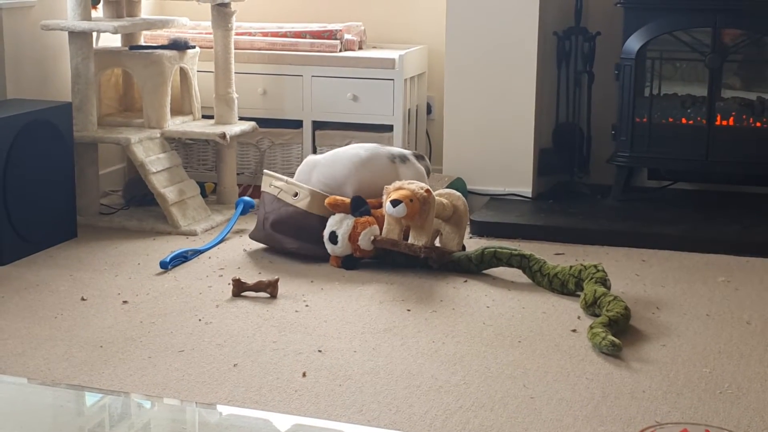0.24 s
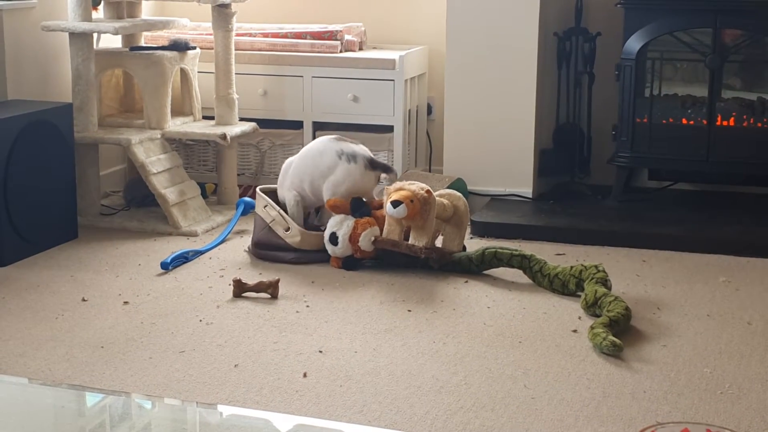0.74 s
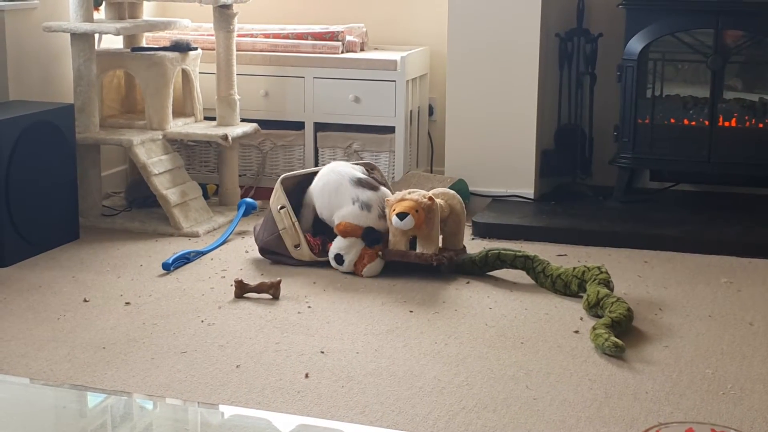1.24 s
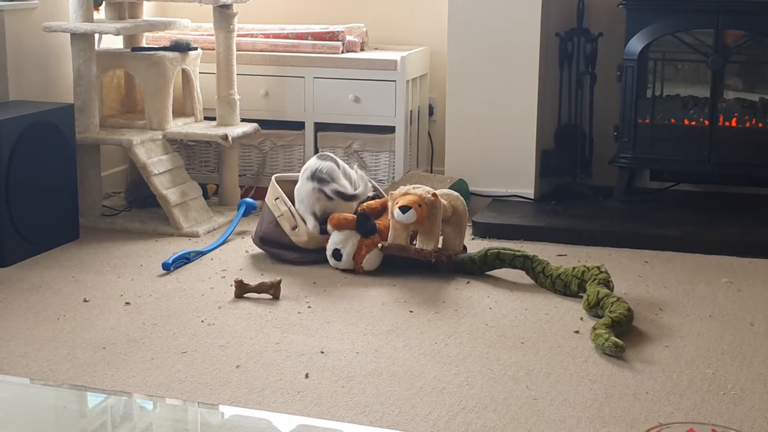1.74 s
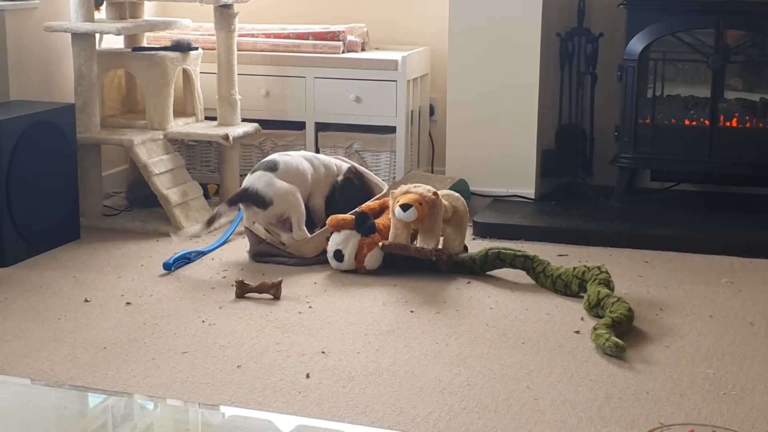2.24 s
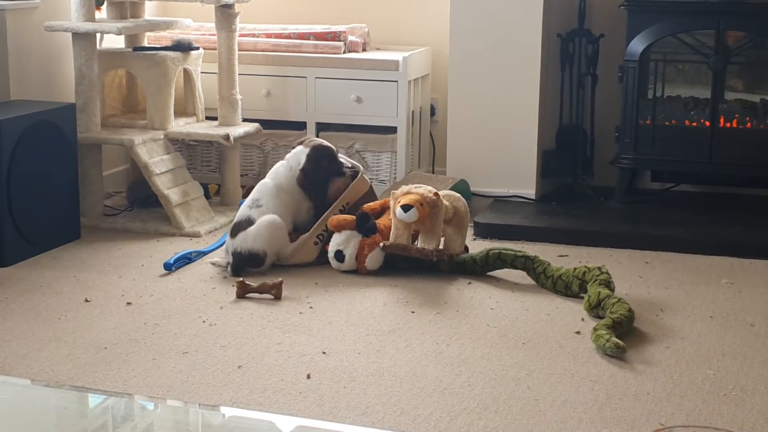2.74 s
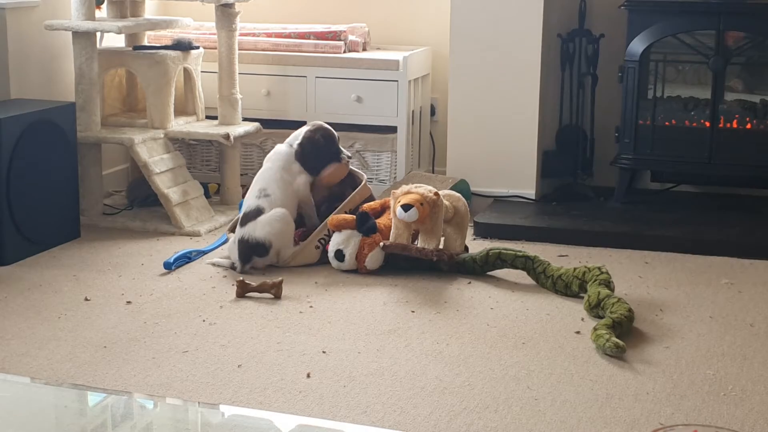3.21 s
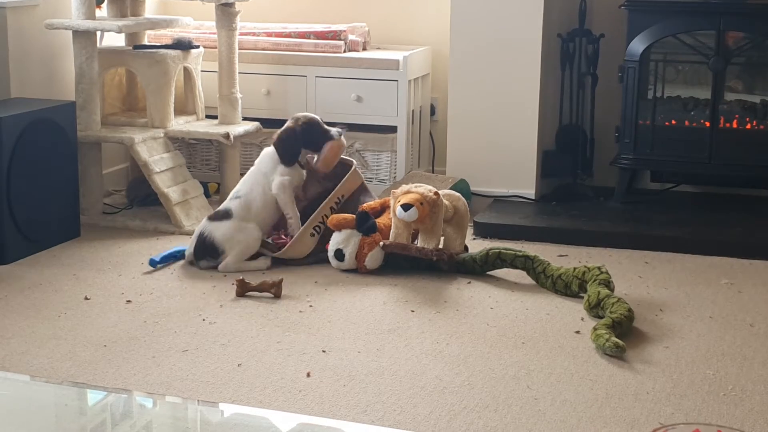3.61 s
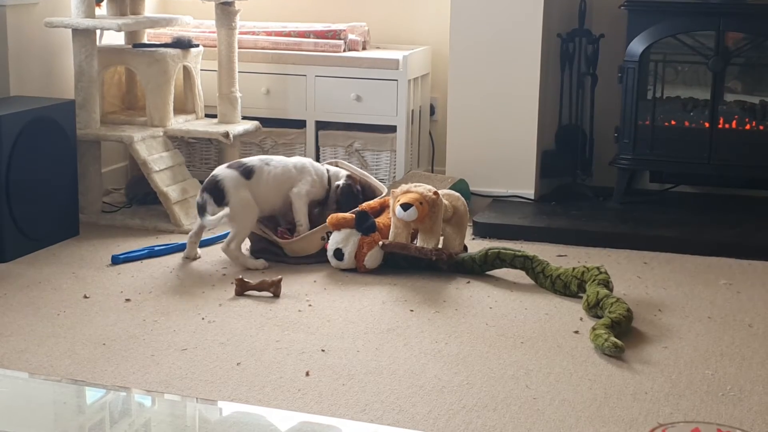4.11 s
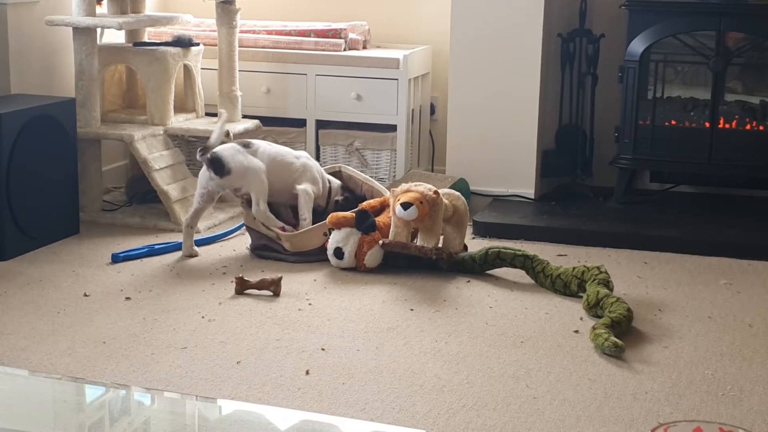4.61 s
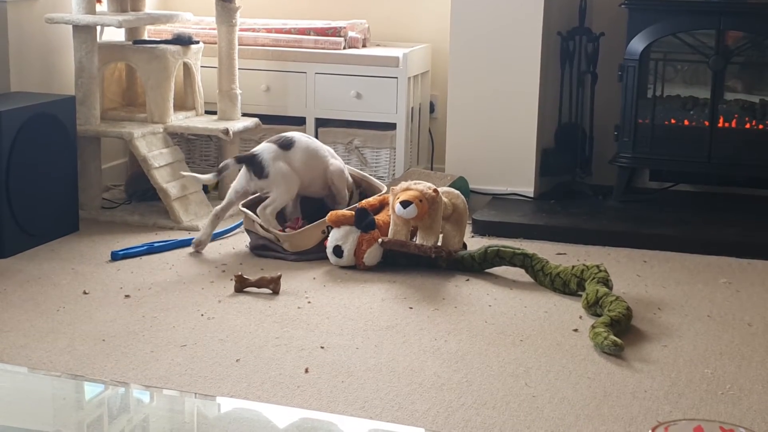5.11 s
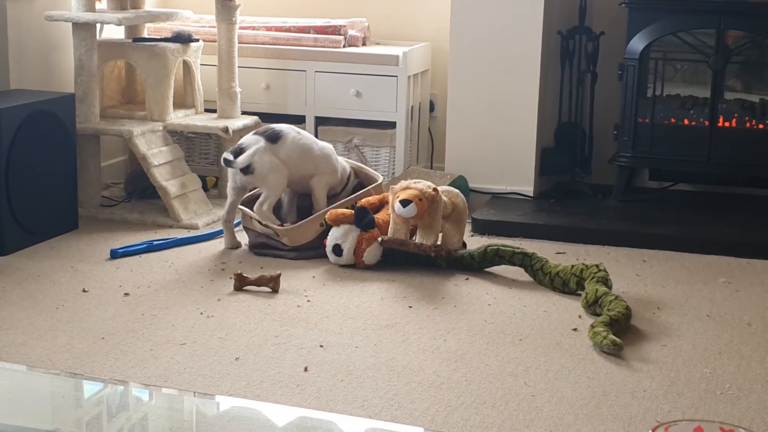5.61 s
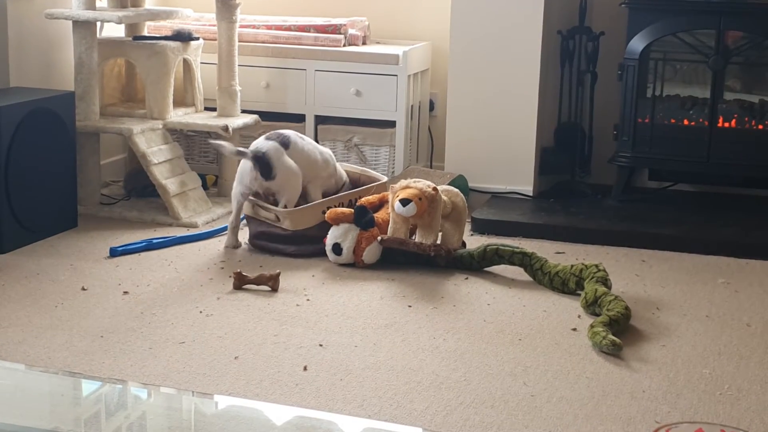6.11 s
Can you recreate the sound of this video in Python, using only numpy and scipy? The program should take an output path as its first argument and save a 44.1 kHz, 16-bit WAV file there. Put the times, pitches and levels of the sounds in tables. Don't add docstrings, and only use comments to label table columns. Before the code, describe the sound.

A puppy rummages in a fabric toy basket in a carpeted living room, heard in stereo by a phone, with a short room response. Two quick, reedy squeaky-toy chirps open at 0 s, two more come at 0.4 s with a paw and toy knock, and another at 0.7 s. Soft cloth strokes continue; a squeak at 1.6 s leads to a paw thump and dull claw catch at 1.75 s. Faint knocks and paired chirps come around 2.1-2.3 s, then a brisk rustle. At 3.3-3.4 s two squeaks, the second strongest, precede the loudest burst at 3.6 s: bright scratch, toy clatter and low, slowing basket judder. A shorter judder and floor rumble follow at 3.85 s. Squeaks at 4.5, 4.8, 5.4 and 5.8 s sit among light rustles, a paw pat at 5.2 s, faint tag tinkles and a toy knock near 6 s. Low hum and faint hiss remain steady.

```python
import sys
import numpy as np
from scipy import signal
from scipy.fft import rfft, irfft, next_fast_len
from scipy.io import wavfile
from scipy.ndimage import uniform_filter1d, map_coordinates

SR = 44100
rng = np.random.default_rng(int(sys.argv[2]) if len(sys.argv) > 2 else 0)


def voltage_ratio(level):
    return 10 ** (np.asarray(level, float) / 20)


def wav_record(signal):
    frames = np.transpose(np.atleast_2d(signal))
    bounded = np.clip(frames, -1, 1)
    quanta = np.round(bounded * 32767).astype(np.int16)
    wavfile.write(sys.argv[1], SR, quanta)


N = 280035

# [t/s, squeeze/s, release/s, full-pressure pitch f/Hz, level/dB]
SQUEAKS = [(.016, 0.014, 0.019, 1970, -36.5), (.061, 0.0039, 0.023, 1287, -45),
           (.369, 0.0081, 0.025, 1978, -40.5), (.404, 0.00384, .024, 1417, -47),
           (.663, .036, .016, 1433, -41), (1.578, 0.025, 0.0033, 2010, -40.5),
           (2.233, .016, 0.014, 1339, -47), (2.259, 0.0031, .02, 1644, -40),
           (3.328, 0.0044, 0.02, 1334, -39), (3.401, 0.00434, 0.0149, 1500, -32.5),
           (4.468, .03, .013, 1518, -43), (4.83, .015, .018, 1678, -37.5), (5.421, .02, 0.029, 1406, -47),
           (5.782, 0.0066, 0.031, 1350, -45.5)]
# [slack pitch f/Hz, brightness/dB per octave, leaking air level/dB, left minus right/dB, lift near 3 kHz/dB]
SQUEAK_COLOURS = [(1395, 0.5, -9, -1.5, 5.5), (1229, 3.5, -7, -3.5, 8.5), (1350, -1.5, -3, -2.5, 1),
                  (1273, -0.5, -2, -3.5, 1), (1377, 0.5, -14.5, -3.5, 3), (1460, -2, -15, -1.5, 3.5),
                  (1300, -0.5, -17, 4, -6), (1484, -0.5, -10, -3, 1.5), (1230, 4.5, -27, -1.5, 9),
                  (1422, 4.5, -11, -1, 5), (1388, 2.5, -18.5, -0.5, 3), (1456, 2.5, -10.5, -2, 7.5),
                  (1362, 2.5, -21, -0.5, 1.5), (1250, 3.5, -19.5, -1.5, 6)]
# [f/Hz, level/dB]
REED = [(650, -69), (1100, 3), (2820, -13), (3360, -11.5), (4150, -9.5), (5070, -12.5), (5540, -13.5),
        (7300, -13), (9210, -12.5), (13100, -17), (15500, -56)]
# [t/s, level/dB, body pitch f/Hz, shake length/s]
PAWS = [(0.375, -53, 223, .03), (0.672, -51.5, 120, 0.052), (1.504, -66, 40, 0.054),
        (1.751, -44.5, 218, 0.041), (1.764, -49.5, 75.4, 0.13), (2.105, -51, 297, .05),
        (2.145, -60.5, 82, 0.17), (3.578, -50, 51.5, 0.16), (3.648, -39.5, 296, 0.04),
        (3.694, -58, 280, .04), (3.924, -43, 195, 0.013), (5.227, -47, 282, 0.043),
        (5.242, -66, 72.4, 0.086), (5.993, -46, 370, 0.016)]
# [t/s, level/dB, body pitch f/Hz, shake
# length/s]
TOYS = [(.002, -49, 1080, 0.015), (0.374, -43.5, 610, 0.029), (0.575, -48, 3730, 0.0034),
        (2.106, -56, 1110, 0.0097), (2.267, -51, 458, 0.086), (2.618, -50, 1100, 0.014),
        (2.849, -68, 915, 0.006), (3.579, -52, 590, 0.026), (3.642, -42, 1120, 0.032),
        (3.643, -43.5, 1800, 0.031), (3.904, -54, 756, 0.056), (4.259, -56.5, 1100, 0.035),
        (4.261, -56, 444, 0.019), (4.629, -58, 1100, 0.044), (5.988, -41, 796, 0.035),
        (6.017, -65, 1300, 0.091)]
# [t/s, level/dB, body pitch f/Hz, shake length/s]
CLAWS = [
    (1.753, -54.5, 1750, 0.03),
    (3.574, -51, 3820, 0.079),
    (3.64, -39, 5200, 0.024),
    (3.79, -64, 1950, 0.027),
    (3.901, -63.5, 1300, 0.097),
    (4.148, -69, 4000, .08),
]
# [t/s, shudder rate f/Hz, level/dB]
SHUDDERS = [
    [(3.568, 131, -42), (3.574, 132, -32.5), (3.59, 108.2, -35), (3.61, 96, -33.5), (3.635, 91, -38),
     (3.665, 90.5, -32.5), (3.695, 95, -65), (3.73, 92, -65)],
    [(3.852, 208, -52), (3.866, 177.6, -35.5), (3.878, 84.8, -41), (3.9, 57.7, -35), (3.93, 79.4, -49),
     (3.97, 71, -51.5), (4.02, 84, -61)],
]
# [t/s, level/dB, low modes level/dB, middle modes level/dB, top modes level/dB]
TINKLES = [
    (.802, -78, -18, -12, 8),
    (1.28, -84, -10, 2, -12),
    (3.955, -70, -14, -5, -10),
    (5.085, -79, -2, -2, -4),
    (5.673, -70.5, 0, 2.5, -14),
    (5.942, -79.5, 8, -16, -22),
    (6.129, -84.5, 12.5, -20, -22),
]
# [f/Hz, level/dB, time to fall 60 dB/s]
TAG_MODES = [
    [(5430, 1.5, 0.088), (5700, -4, 0.12), (5900, -6, 0.12), (4850, -5, 0.14)],
    [(11400, 4, 0.091), (11780, -8, .1)],
    [(14700, -5, .15), (15520, 1, .15)],
]
# [full contact t/s, hold/s, level/dB, brightness/dB per octave]
STROKES = [(0.237, 0.015, -62.5, -1.5), (0.477, 0.027, -77, 3), (0.612, 0.11, -57, -2),
           (0.854, 0.09, -62, 1.5), (1.128, 0.042, -56.5, 1), (1.282, 0.23, -66.5, -0.2),
           (1.748, 0.024, -57, -2), (1.854, 0.16, -63, 0.6), (2.13, 0.049, -66, 2.5),
           (2.24, 0.091, -63, -2), (2.372, .02, -51.5, 0.7), (2.624, 0.11, -63.5, 1.2),
           (3.12, 0.28, -73.5, -0.5), (3.463, 0.17, -56, -0.5), (3.808, 0.034, -61.5, -3),
           (4.186, 0.021, -64, 1.5), (4.597, 0.14, -70.5, -1), (4.973, 0.043, -68.5, 0),
           (5.326, 0.083, -62, 0.1), (5.664, 0.21, -70.5, 3.5), (6.03, 0.03, -67.5, 2)]
# [f/Hz, level/dB per Hz]
CLOTH = [(300, -3), (800, -4.5), (1500, -5), (3000, -9), (6400, -10), (9000, -15), (12400, -20.5),
         (14000, -24.5), (15600, -32)]
# [t/s, hold/s, level/dB]
TREADS = [
    (0.077, 0.021, -62),
    (0.38, .03, -73),
    (1.33, .06, -63),
    (2.25, .1, -67),
    (3.1, 0.034, -69),
    (3.82, 0.11, -54),
    (4.227, 0.024, -73),
    (5.35, 0.049, -63.5),
    (5.966, 0.046, -62),
]
# [f/Hz, level/dB per Hz]
BOARDS = [(13, -59), (22, -18), (70, -6), (87, 7), (146, -10.5), (180, -4), (230, -37), (400, -120)]
# [f/Hz, level/dB per Hz]
HUM = [(71, -59), (120, -27.5), (146, -19), (173, -4.5), (233, -3), (264, -7), (327, -6.5), (377, -20),
       (475, -15.5), (510, -17.5), (557, -14.5), (787, -17), (830, -32), (875, -16.5), (1000, -63),
       (1300, -65), (2200, -120)]
# [f/Hz, level/dB per Hz]
HISS = [(470, -49), (800, -13.5), (1280, -10.5), (1530, -26), (1910, -16.5), (2810, -40), (3260, -38.5),
        (7320, -33), (8610, -33), (15600, -46)]
# [f/Hz, likeness/0 to 1]
ALIKE = [(60, 0.86), (240, 1), (950, 0.54), (3770, 0.024), (15000, 0.02)]
# [f/Hz, time to fall 60 dB/s]
ROOM = [(100, 0.22), (1400, 0.28), (5000, 0.25), (12000, 0.21)]
# [f/Hz, left minus right/dB]
SHADE = [(60, 0), (120, 0), (240, 0.5), (480, -0.5), (950, 1), (1890, 2), (3770, 6.5), (7520, 2),
         (15000, 2)]
# [f/Hz, half width f/Hz, level/dB]
DIPS = [(4350, 880, -2.5), (7465, 760, -8), (15100, 2700, -3)]


def unit(x):
    return x / np.sqrt(np.mean(x ** 2) + 1e-20)


def along(points, hz):
    f, v = np.transpose(points)
    return np.interp(np.log(hz + 1), np.log(f + 1), v)


def wobble(rate, size):
    return map_coordinates(rng.standard_normal(N // 256), [np.arange(size) * rate / SR])


def filtered(x, response):
    m = next_fast_len(x.shape[-1] + 8192)
    spectrum = rfft(x, m) * response(np.fft.rfftfreq(m, 1 / SR))
    return irfft(spectrum, m)[..., :x.shape[-1]]


def gesture(rows):
    s, *columns = np.transpose(rows)
    t = np.arange(s[0], s[-1], 1 / SR)
    return round(s[0] * SR), [np.interp(t, s, column) for column in columns]


def contact_db(t, s, hold, attack_db_s, release_db_s):
    return -attack_db_s * np.maximum(s - t, 0) - release_db_s * np.maximum(t - s - hold, 0)


def rush(spectrum, alike, patchy_db):
    z = signal.stft(rng.standard_normal((2, N)), nperseg=512)[2]
    patches = uniform_filter1d(rng.standard_normal(z.shape[1:]), 6, 0)
    patches = uniform_filter1d(patches, 10, 1)
    pair = signal.istft(z * voltage_ratio(patchy_db * unit(patches)), nperseg=512)[1][:, :N]

    def mid_side(hz):
        turn = np.arccos(np.clip(along(alike, hz), -1, 1)) / 2
        return voltage_ratio(along(spectrum, hz)) * [np.cos(turn), np.sin(turn)]

    mid, side = filtered(pair, mid_side)
    return unit(np.array([mid + side, mid - side]))


def add(out, start, sound, wet_db, pan_db=0):
    hz, t, z = signal.stft(rng.standard_normal((2, SR // 3)), SR, nperseg=256)
    decay = voltage_ratio(-60 * t / along(ROOM, hz)[:, None])
    tail = signal.istft(z * decay, SR, nperseg=256)[1]
    shared = 1 / (1 + (np.fft.rfftfreq(tail.shape[1], 1 / SR) / 450) ** 2)
    both = rfft(tail)
    tail = irfft(both * (1 - shared) + both[0] * shared, tail.shape[1])
    tail = voltage_ratio(wet_db) * tail / np.linalg.norm(tail[0])
    tail = np.pad(tail, ((0, 0), (130, 0)))
    tail[[0, 1], [1750, 1790]] += .3
    tail[0, 1] = tail[1, 0] = 1
    heard = signal.fftconvolve(sound[None], tail, axes=1)
    out[:, start:start + heard.shape[1]] += heard * voltage_ratio(pan_db * np.array([[.5], [-.5]]))


def squeaker(out):
    for tread, toy in zip(SQUEAKS, SQUEAK_COLOURS):
        s, squeeze, release, top_hz, top_db = tread
        slack_hz, tilt_db, leak_db, pan_db, lift_db = toy
        since = np.arange(0, squeeze + release, 1 / SR)
        unbuilt = np.cos(np.pi / 2 * np.clip(since / squeeze, 0, 1) ** 1.103) ** 2
        spent = np.clip((since - squeeze) / release, 0, 1)
        hz = top_hz - (top_hz - slack_hz) * (unbuilt + spent ** 1.3)
        hz = hz - 0.13 * slack_hz * spent ** 4.8
        swell_db = 30 * np.log2(top_hz / slack_hz) * unbuilt
        dying_db = 6.5 * spent ** 2.5
        db = top_db - swell_db - dying_db

        def colour(f):
            tilt = tilt_db * np.log2((f + 1) / 3000)
            lift = lift_db * np.exp(-((f - 3000) / 700) ** 2)
            return voltage_ratio(along(REED, f) + tilt + lift)

        phase = 2 * np.pi * np.cumsum(hz * (1 + 0.0088 * wobble(412, len(hz)))) / SR
        k = np.arange(1, 13)[:, None]
        weakness = voltage_ratio(0.0097 * k * (db - db.max()))
        overtones = colour(k * hz) * weakness * np.sin(k * phase + 6 * rng.random(k.shape))
        stack = unit(np.sum(overtones, axis=0))
        leak = unit(filtered(rng.standard_normal(len(hz)), lambda f: colour(f) * (f > 900)))
        edge = np.clip(since / 0.0045, 0, 1) * np.clip(since[::-1] / 0.00063, 0, 1)
        chirp = voltage_ratio(db) * edge * (stack + voltage_ratio(leak_db) * leak)
        add(out, round(s * SR), chirp, wet_db=3.5, pan_db=pan_db)


def knocks(out, hits, width):
    t = np.arange(SR // 4) / SR
    for s, db, hz, length in hits:
        width_hz = width * hz
        onset = 1 - np.exp(-t / (0.045 * length))
        shake = rng.standard_normal(len(t)) * voltage_ratio(-26 * t / length) * onset

        def body(f):
            loss = 1j * f * width_hz
            resonance = (loss / (hz * hz - f * f + loss)) ** 2
            return resonance / (1 + (f / (hz + width_hz)) ** 6)

        knock = filtered(shake, body)
        add(out, round(s * SR), voltage_ratio(db + 5.0) * knock / np.abs(knock).max(), wet_db=2.5)


def basket_shudder(out):
    for rows in SHUDDERS:
        start, (hz, db) = gesture(rows)
        size = len(hz)
        phase = 2 * np.pi * np.cumsum(hz * (1 + .05 * wobble(60, size))) / SR
        push = np.sin(phase)
        push = push + 0.27 * np.sin(2 * phase + wobble(52, size))
        push = push + 0.16 * np.sin(3 * phase + 2 * wobble(51, size))
        edge = signal.windows.tukey(size, .1)
        add(out, start, voltage_ratio(db + 0.87 * wobble(77, size)) * edge * unit(push), wet_db=-4.5)


def collar_tag(out):
    t = np.arange(SR // 4) / SR
    for s, db, *strengths in TINKLES:
        ring = np.zeros(len(t))
        for modes, group_db in zip(TAG_MODES, strengths):
            for hz, level, t60 in modes:
                fade = voltage_ratio(group_db + level - 60 * t / t60 + 4.5 * wobble(60, len(t)))
                ring += fade * np.sin(2 * np.pi * hz * t + 4.3 * wobble(100, len(t)))
        add(out, round(s * SR), voltage_ratio(db) * ring * (1 - np.exp(-t / 0.0012)), wet_db=7)


def cloth_rustle():
    fibres = rush(CLOTH, [(500, 0.58), (3000, 0.033)], patchy_db=1.4)
    hz, t, z = signal.stft(fibres, SR, nperseg=512)
    octaves = np.log2((hz[:, None] + 300) / 5000)
    power = voltage_ratio(2 * -76)
    for s, hold, db, tilt_db in STROKES:
        stroke_db = db + contact_db(t, s, hold, attack_db_s=125, release_db_s=108)
        power = power + np.outer(voltage_ratio(2 * tilt_db * octaves), voltage_ratio(2 * stroke_db))
    flutter = voltage_ratio(1.1 * wobble(30, N))
    return flutter * signal.istft(z * np.sqrt(power), SR, nperseg=512)[1][:, :N]


def floor_boards():
    t = np.arange(N) / SR
    weight = voltage_ratio(-64.5)
    for s, hold, db in TREADS:
        weight = weight + voltage_ratio(db + contact_db(t, s, hold, attack_db_s=117, release_db_s=100))
    return weight * voltage_ratio(1.5 * wobble(9, N)) * rush(BOARDS, ALIKE, patchy_db=.7)


def room_hum():
    return voltage_ratio(-54) * voltage_ratio(.4 * wobble(3, N)) * rush(HUM, ALIKE, patchy_db=.7)


def hiss():
    return voltage_ratio(-69.5) * rush(HISS, ALIKE, patchy_db=.7)


def scene():
    out = np.zeros((2, N + SR))
    squeaker(out)
    knocks(out, PAWS, width=1)
    knocks(out, TOYS, width=1)
    knocks(out, CLAWS, width=1.6)
    basket_shudder(out)
    collar_tag(out)
    return out[:, :N] + cloth_rustle() + floor_boards() + room_hum() + hiss()


def low_pass(x):
    return signal.sosfilt(signal.butter(12, 15790, fs=SR, output="sos"), x)


def record(dry):
    def port_response(hz):
        dull = sum(db * np.exp(-((hz - centre_hz) / width_hz) ** 4) for centre_hz, width_hz, db in DIPS)
        return voltage_ratio(dull + along(SHADE, hz) * np.array([[.5], [-.5]]))

    ports = filtered(dry, port_response)
    return low_pass(ports)


dry = scene()
out = record(dry)
wav_record(out)
```